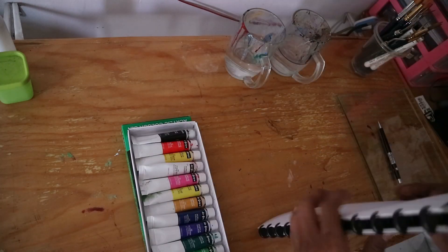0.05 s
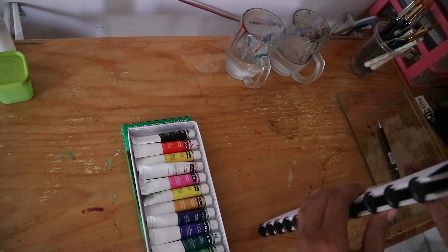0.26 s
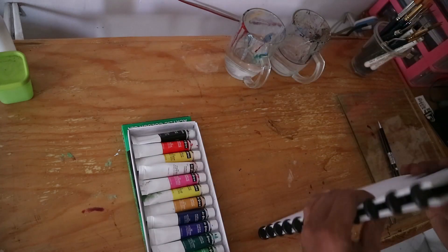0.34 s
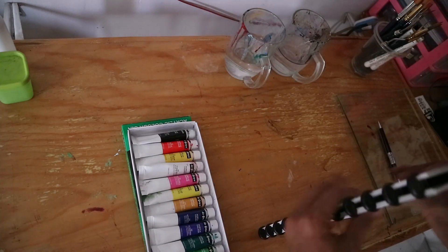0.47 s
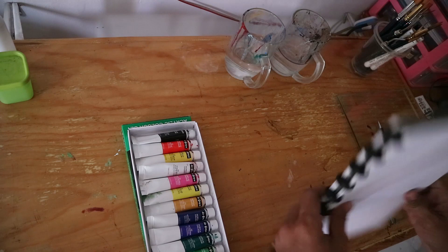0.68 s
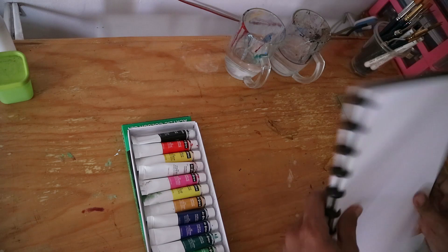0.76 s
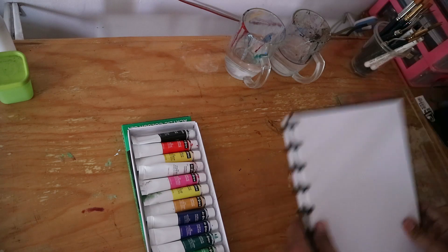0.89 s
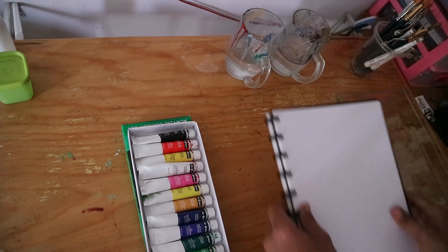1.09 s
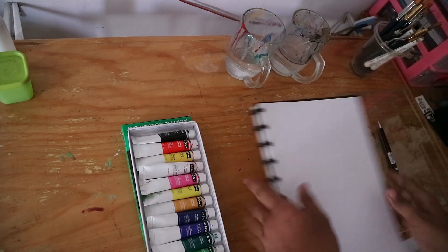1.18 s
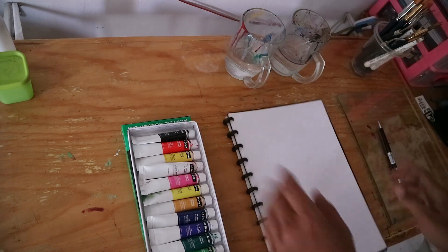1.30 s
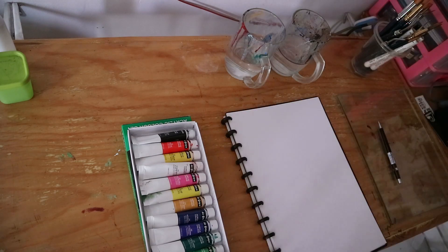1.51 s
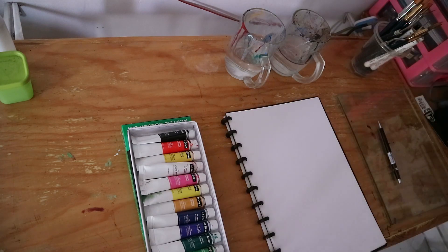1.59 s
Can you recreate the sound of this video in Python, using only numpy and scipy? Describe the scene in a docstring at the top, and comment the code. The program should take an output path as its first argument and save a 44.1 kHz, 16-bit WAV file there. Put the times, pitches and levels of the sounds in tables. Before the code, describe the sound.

A sketchbook knocks on a wooden table, then drops flat with a sharp plastic clack.

```python
"""Sketchbook on a wooden table

A small room, a stereo microphone by the table. The edge of a disc-bound sketchbook knocks on the
wood and sets it ringing. The book is turned over with a faint rub of paper, then drops flat: the
cover touches first and the plastic discs clack down in a quick run, a little to the right.
The recorder's gain control ducks the room noise after each loud blow."""
import sys
import numpy as np
from scipy import signal
from scipy.fft import rfft, irfft
from scipy.io import wavfile
from scipy.ndimage import uniform_filter1d

SR = 44100
rng = np.random.default_rng(int(sys.argv[2]) if len(sys.argv) > 2 else 0)


def wrap_up_sound(samples):
    """Save the sound to the file named by the first command line argument, as 16-bit audio."""
    columns = np.atleast_2d(samples).T
    # keep every value between -1 and 1, then stretch to whole-number steps
    tamed = np.clip(columns, -1, 1)
    steps = np.round(tamed * 32767).astype(np.int16)
    wavfile.write(sys.argv[1], SR, steps)


N = 72765
T = np.arange(N) / SR
HZ = np.fft.rfftfreq(2 * N, 1 / SR)
DIRECT_LIKENESS, ROOM_LIKENESS, AIR_LIKENESS = 0.85, 0.067, 0.2  # left-right correlation

# The book's edge meeting the table: (time [s], relative level [dB])
EDGE_KNOCKS = [(0.1311, 1), (0.1360, 4.5), (0.1409, -18.5), (0.1460, -3)]
# The binding discs landing: (time [s], relative level [dB])
DISC_CLACKS = [(1.348, -8), (1.3495, -0.5), (1.351, -2), (1.3523, 4.5), (1.3542, -7.5), (1.3570, -8.5)]


def amp(db):
    """Decibels to gain."""
    return 10 ** (np.asarray(db) / 20)


def unit(x):
    """Scales to rms 1."""
    return x / np.sqrt(np.mean(x ** 2) + 1e-20)


def read(points, hz):
    """Reads a table on a log-frequency axis."""
    table_hz, value = np.transpose(points)
    return np.interp(np.log(hz + 1), np.log(table_hz + 1), value)


def colour(x, spectrum):
    """Minimum-phase filter of unit power: only the shape of the spectrum counts."""
    log_gain = np.log(unit(amp(read(spectrum, HZ))))
    mirrored = np.concatenate([log_gain, log_gain[-2:0:-1]])
    response = np.exp(np.conj(signal.hilbert(mirrored)))[:N + 1]
    return irfft(rfft(x, 2 * N) * response)[..., :N]


def pair(x, likeness):
    """Blends two unrelated signals into a left and right of the given likeness."""
    right, other = rfft(x, 2 * N)
    shared = np.clip(likeness, 0, 1)
    left = shared * right + np.sqrt(1 - shared ** 2) * other
    return irfft(np.array([left, right]))[:, :N]


def diffuse_noise(treble_likeness, corner_hz=1000):
    """Sound from all sides: alike in both channels in the bass, less so above the corner."""
    likeness = treble_likeness + (1 - treble_likeness) / (1 + (HZ / corner_hz) ** 2)
    return pair(rng.standard_normal((2, N)), likeness)


def fade(start_s, t60_s):
    """Starts at once and dies away by 60 dB in t60_s."""
    return (T >= start_s) * amp(-60 * np.maximum(T - start_s, 0) / t60_s)


def swell(middle_s, length_s):
    """A bell-shaped rise and fall."""
    return np.exp(-(2 * (T - middle_s) / length_s) ** 2)


def crunch(hits, spectrum, t60_s):
    """Each contact is a short crush of tiny impacts."""
    level = np.sqrt(sum((amp(db) * fade(s, t60_s)) ** 2 for s, db in hits))
    impacts = pair(rng.choice([-1., 1.], (2, N)), DIRECT_LIKENESS)
    return colour(level * impacts, spectrum)


def ring(hits, modes):
    """Each contact sets the modes of an object ringing."""
    note = sum(amp(db) * fade(0, t60) * np.sin(2 * np.pi * hz * T) for hz, db, t60 in modes)
    return sum(amp(db) * np.interp(T - s, T, note, left=0) for s, db in hits)


def room_tone(boom_hz=111, boom_width_hz=11):
    """Dull, steady room noise with one low room resonance."""
    # Room noise: (frequency [Hz], relative density [dB])
    spectrum = [(25, -24), (50, -25), (68, -12), (90, -10), (160, 0), (205, -12), (265, -3.5), (320, -10),
                (430, -3), (600, -12.5), (800, -10.5), (1400, -19), (2300, -23.5), (3500, -32.5),
                (7000, -46.5), (12000, -56.5), (16000, -83.5)]
    wash = unit(colour(diffuse_noise(AIR_LIKENESS), spectrum))
    wash = wash * amp([[2.5], [0]])  # left, right
    resonance = 1 / (1 + (2 * (HZ - boom_hz) / boom_width_hz) ** 2)
    boom = irfft(rfft(rng.standard_normal(2 * N)) * resonance)[:N]
    return amp(-43.5) * wash + amp(-53) * unit(boom)


def room_tail(start_s, spectrum, delay_s=0.0066, build_s=0.0041):
    """The small room answers a blow with a dense tail whose treble dies first."""
    # Reverberation time: (frequency [Hz], t60 [s])
    decay_times = [(100, 0.5), (260, 0.4), (700, 0.48), (1800, 0.41), (4800, 0.4), (8000, 0.35),
                   (14000, 0.22)]
    wash = colour(diffuse_noise(ROOM_LIKENESS), spectrum)
    hz, t, bands = signal.stft(wash, SR, nperseg=512)
    decay = amp(-60 * np.maximum(t - start_s, 0) / read(decay_times, hz)[:, None])
    tail = signal.istft(bands * decay, SR, nperseg=512)[1][:, :N]
    return tail * np.clip((T - start_s - delay_s) / build_s, 0, 1)


def reverberation():
    """The room's two answers: dark after the knock, brighter after the drop."""
    # Tail of the knock: (frequency [Hz], relative density [dB])
    knock_spectrum = [(40, -54.5), (75, -28.5), (115, 4), (220, -2), (450, -3), (620, 0.5), (880, -5),
                      (1200, -8.5), (1800, -12.5), (3000, -24.5), (6000, -42), (10000, -52), (16000, -73)]
    # Tail of the drop: (frequency [Hz], relative density [dB])
    drop_spectrum = [(40, -28.5), (100, -11.5), (170, 1.5), (300, 2.5), (600, -8), (1200, -1.5),
                     (2300, 0.5), (3600, -2), (6000, -8), (9500, -18.5), (12000, -35.5), (16000, -78.5)]
    knock_tail = amp(-14) * room_tail(EDGE_KNOCKS[0][0], knock_spectrum)
    drop_tail = amp(-16.5) * room_tail(DISC_CLACKS[0][0], drop_spectrum)
    return knock_tail + drop_tail


def paper_rubs(grain_db=2.5):
    """Grainy friction of fingers on paper swells and fades with each shift of the hands."""
    # Shifts of the hands: (middle [s], length [s], level [dB])
    shifts = [(0.02, 0.4, -64.5), (0.384, 0.067, -56.5), (0.543, 0.037, -56.5), (0.608, 0.018, -60.5),
              (0.634, .1, -59.5), (0.716, 0.05, -68), (0.82, 0.014, -59), (1.142, .4, -76)]
    # Paper friction: (frequency [Hz], relative density [dB])
    spectrum = [(500, -21), (2500, 12.5), (5500, 2.5), (8000, -3), (12000, -12), (16000, -37)]
    level = sum(amp(db) * swell(middle, length) for middle, length, db in shifts)
    flicker = unit(uniform_filter1d(rng.standard_normal(N), size=90))  # grains of about 2 ms
    grain = unit(amp(grain_db * flicker))
    friction = pair(rng.standard_normal((2, N)), ROOM_LIKENESS)
    return colour(level * grain * friction, spectrum)


def hand_slide():
    """The book slides through the hands with a soft, dull swish that stops as the discs land."""
    # Swish: (frequency [Hz], relative density [dB])
    spectrum = [(100, -25), (400, -1.5), (900, 6), (1500, -4.5), (4000, -28), (16000, -65.5)]
    level = swell(middle_s=1.3, length_s=0.74) * (T < DISC_CLACKS[0][0])
    return amp(-53.5) * colour(level * diffuse_noise(ROOM_LIKENESS), spectrum)


def edge_knock(wood_low_hz=101.6):
    """The card edge strikes and rocks on the table top, which rings but radiates little deep bass."""
    # Modes of the table top: (frequency [Hz], relative level [dB], t60 [s])
    wood_modes = [(116.7, -22, 0.53), (155, -17.5, 0.12), (299, -20, 0.084), (369.5, -18, 0.056),
                  (582, -22.5, .34), (622, -2, 0.034), (688.7, -31.5, 0.37), (856.4, -8, 0.047),
                  (1061, -45, 0.076), (1315, -36.5, 0.18), (1525, -32, 0.045), (1825, -29, .1)]
    # Crunch of the card edge: (frequency [Hz], relative density [dB])
    edge_spectrum = [(40, -35), (75, -25), (130, -9), (400, 1.5), (820, 8.5), (1100, -6), (1800, -4),
                     (3000, -10), (6000, -26), (10000, -41), (16000, -69)]
    low_cut = signal.butter(N=5, Wn=wood_low_hz, btype="high", fs=SR, output="sos")
    wood = signal.sosfilt(low_cut, ring(EDGE_KNOCKS, wood_modes))
    return wood + amp(-12.5) * crunch(EDGE_KNOCKS, edge_spectrum, t60_s=0.043)


def flat_drop(left_lag_s=0.00005):
    """The cover pats the table, then the plastic discs clack down one after another and ring."""
    # The cover landing: (time [s], level [dB])
    pats = [(1.335, -26.5), (1.3395, -29.5), (1.346, -27)]
    # Pat of the cover: (frequency [Hz], relative density [dB])
    cover_spectrum = [(40, -29.5), (150, -7.5), (300, -11), (900, 3.5), (1500, -9), (3500, -15.5),
                      (7000, -28), (10000, -37), (16000, -73.5)]
    # Click of a disc on wood: (frequency [Hz], relative density [dB])
    disc_spectrum = [(40, -31.5), (90, -28), (160, -14), (290, -3.5), (550, -13), (1000, -5.5), (1500, -9),
                     (1850, -0.5), (2750, -2.5), (3600, 5), (4400, -7), (6000, -9), (8000, -16.5),
                     (10000, -18.5), (12500, -39), (16000, -52.5)]
    # Modes of the discs: (frequency [Hz], relative level [dB], t60 [s])
    disc_modes = [(1860, -18, 0.037), (2220, -54.5, .02), (2418, -12.5, 0.06), (3000, -20.5, 0.0082),
                  (3890, -14, 0.025)]
    clicks = amp(2) * crunch(DISC_CLACKS, disc_spectrum, t60_s=0.013)
    cover = crunch(pats, cover_spectrum, t60_s=0.055)
    left, right = cover + clicks + ring(DISC_CLACKS, disc_modes)
    lag = np.exp(-2j * np.pi * HZ * left_lag_s)  # the book lands right of the microphone
    return np.array([irfft(rfft(left, 2 * N) * lag)[:N], right])


def gain_control(x, threshold_db=-15, duck_share=0.54, release_db_per_s=11):
    """A blow ducks the gain by a share of its excess over the threshold; the gain then creeps back."""
    power = uniform_filter1d((x ** 2).mean(0), size=400)
    power_db = 10 * np.log10(abs(power) + 1e-12)
    release_db = T * release_db_per_s
    held_db = np.maximum.accumulate(power_db + release_db) - release_db
    excess_db = np.maximum(held_db - threshold_db, 0)
    return x * amp(-duck_share * uniform_filter1d(excess_db, size=64))


def scene():
    """Knock, handling and drop in the small room, as they reach the microphone."""
    return reverberation() + edge_knock() + flat_drop() + paper_rubs() + hand_slide() + room_tone()


def record(dry, ceiling=0.95, band_limit_hz=15800):
    """A stereo microphone, quieter on the left; then gain control, rounded peaks and a band limit."""
    # Left channel against right: (frequency [Hz], gain [dB])
    left_gain = [(60, -7.5), (120, -3), (200, -8), (330, -15), (700, -8.5), (1400, -6.5), (2300, -5.5),
                 (4500, -5.5), (8000, -4.5), (15000, -4.5)]
    # Left channel against right: (frequency [Hz], phase [rad])
    left_phase = [(60, -0.97), (170, -2), (330, -2.5), (550, -5), (1000, -4.5), (2000, -5), (4500, -4.0),
                  (12000, -4.5)]
    left_response = amp(read(left_gain, HZ)) * np.exp(1j * read(left_phase, HZ))
    left = irfft(rfft(dry[0], 2 * N) * left_response)[:N]
    ducked = gain_control(np.array([left, dry[1]]))
    rounded = ducked / (1 + (ducked / ceiling) ** 4) ** 0.25
    low_pass = signal.firwin(255, band_limit_hz, window=("kaiser", 9), fs=SR)
    return signal.oaconvolve(rounded, low_pass[None], "same")


dry = scene()
out = record(dry)
wrap_up_sound(out)
```